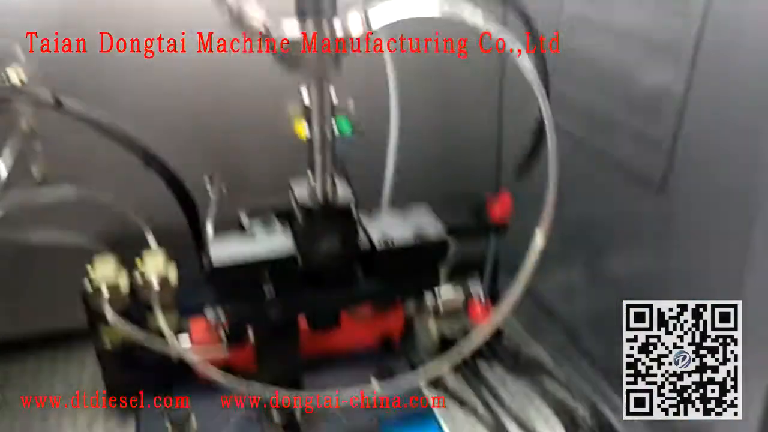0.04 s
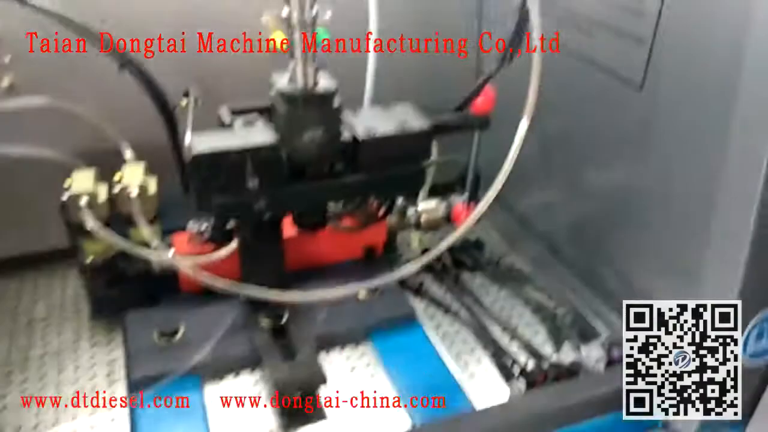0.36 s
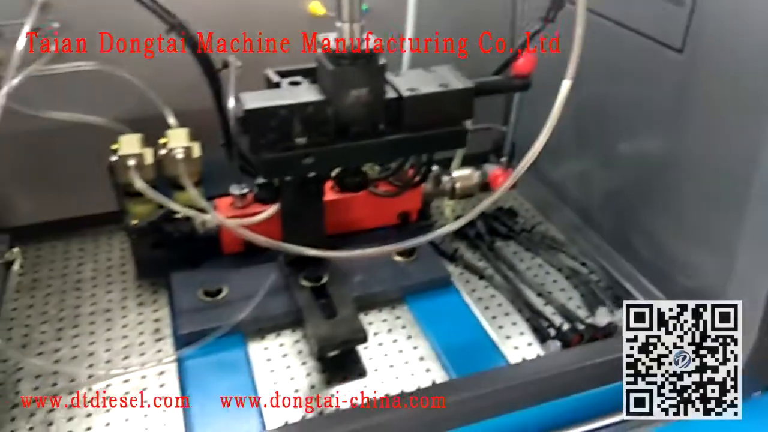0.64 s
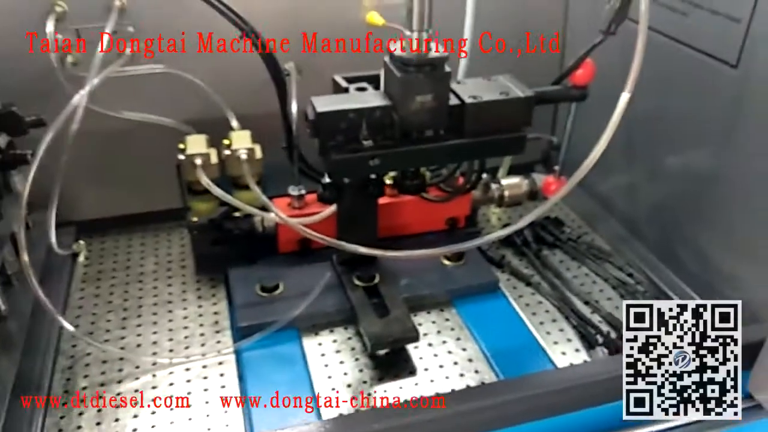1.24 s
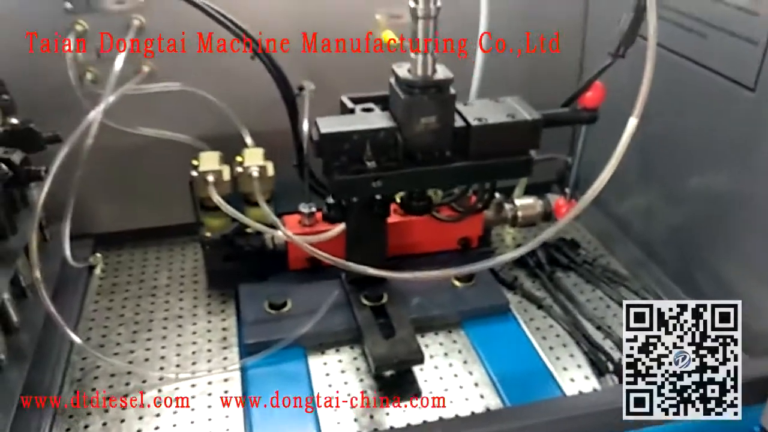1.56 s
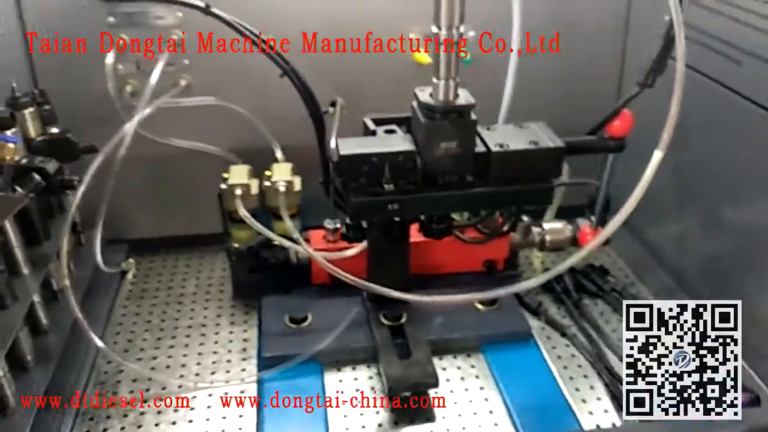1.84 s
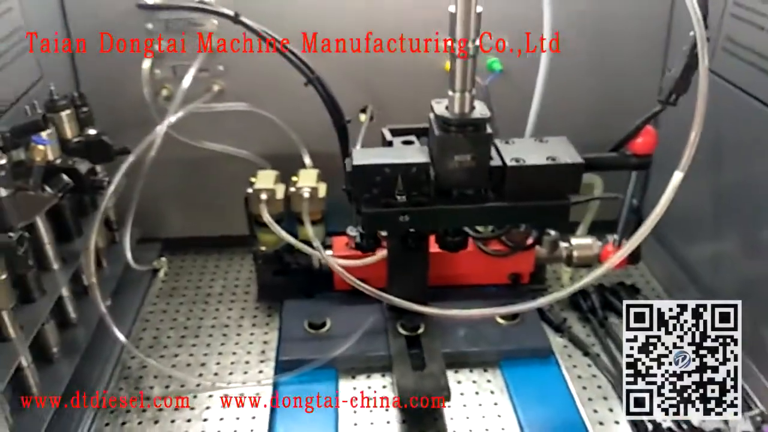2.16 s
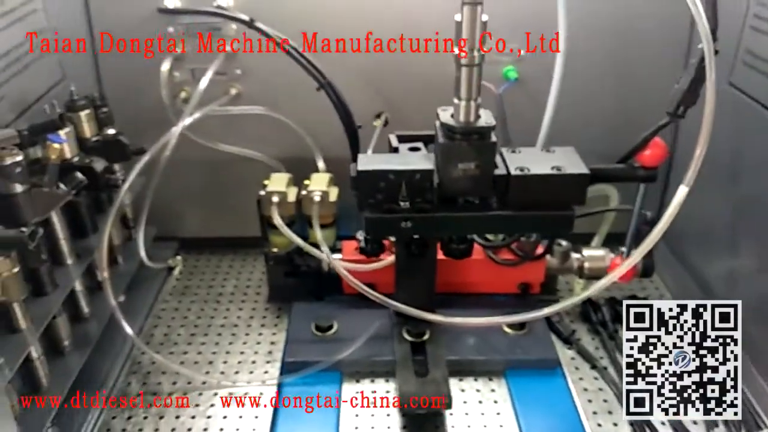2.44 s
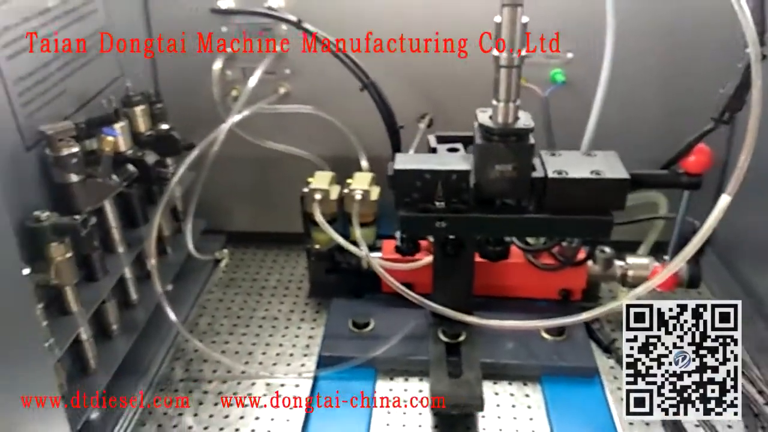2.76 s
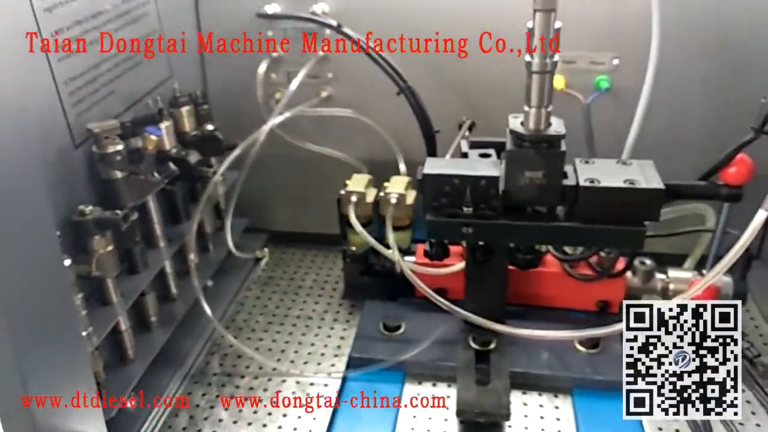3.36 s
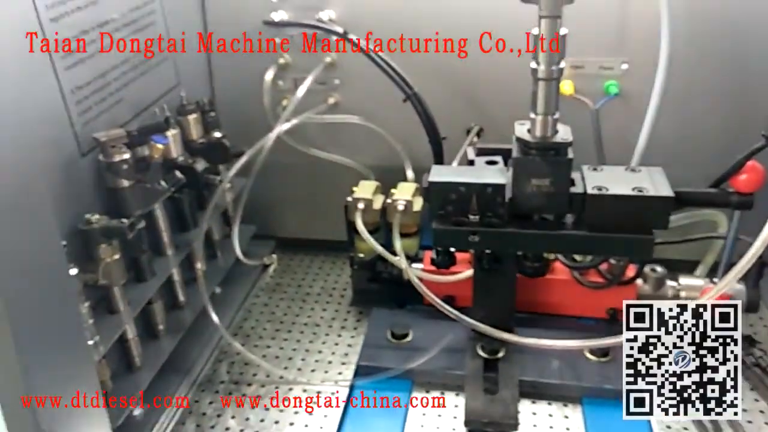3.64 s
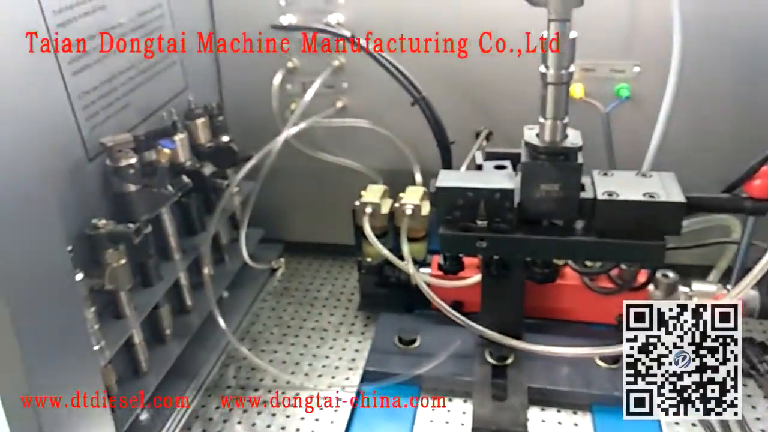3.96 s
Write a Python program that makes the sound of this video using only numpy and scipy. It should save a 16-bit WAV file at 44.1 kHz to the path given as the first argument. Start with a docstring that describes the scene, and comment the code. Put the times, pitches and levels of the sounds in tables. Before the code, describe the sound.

Inside a steel cabinet, a fuel injector rattles fast and regularly throughout, its bright clicks ringing and buzzing near a hand-held microphone. The test machine's motor rushes and rumbles beneath it with a faint high whine.

```python
"""Diesel injector on a test bench

An injector fires 17 times a second in a steel cabinet, heard from a hand-held microphone. Each valve
impact gives a bright crack and excites the normal modes of the injector and its clamping fixture.
The nozzle needle then oscillates in the fuel flow, a short buzz that reflects off the cabinet walls.
Underneath, the drive motor rushes and rumbles and its inverter whines."""
import sys
import numpy as np
from scipy import signal
from scipy.fft import rfft, irfft
from scipy.io import wavfile
from scipy.ndimage import map_coordinates

SR = 44100
rng = np.random.default_rng(int(sys.argv[2]) if len(sys.argv) > 2 else 0)


def pcm_store(signal):
    """Save signal as 16-bit PCM."""
    levels = np.round(np.clip(np.atleast_2d(signal), -1, 1) * 32767)
    wavfile.write(sys.argv[1], SR, levels.astype(np.int16).T)


N = 176400
TIME = np.arange(N) / SR
SHOTS_PER_S, FIRST_SHOT_S = 17.001, .0212
PERIOD, LEAD_S = round(SR / SHOTS_PER_S), .008  # samples per cam turn; a turn starts LEAD_S before its shot
SHOT, TURN_SAMPLE = np.divmod(np.arange(N) + PERIOD - round((FIRST_SHOT_S - LEAD_S) * SR), PERIOD)
AGE = TURN_SAMPLE / SR - LEAD_S  # time since this turn's shot, in s


def from_db(db):
    """Amplitude ratio of a level in decibels."""
    return 10 ** (np.asarray(db) / 20)


def rms_one(x):
    """Normalisation to unit rms."""
    return x / np.sqrt(np.mean(x ** 2) + 1e-20)


def coloured(noise, spectrum):
    """Spectral shaping to unit rms, with the level interpolated over log frequency."""
    hz, db = np.transpose(spectrum)
    bin_hz = np.maximum(np.arange(N // 2 + 1) * SR / N, 1)
    gain = from_db(np.interp(np.log(bin_hz), np.log(hz), db))
    return rms_one(irfft(rfft(noise) * gain, N))


def drift(knots_per_s):
    """Smooth random modulation with a standard deviation near 1."""
    return map_coordinates(rng.standard_normal(400), [TIME * knots_per_s], order=3, mode="wrap")


def per_shot(spread_db):
    """Log-normal scatter of amplitude from shot to shot."""
    return from_db(spread_db * rng.standard_normal(SHOT[-1] + 1))[SHOT]


def cyclic_noise(share, memory):
    """Cyclic correlation: a share of the power is a pattern, correlated by `memory` from turn to turn."""
    turns = rng.standard_normal((SHOT[-1] + 1, PERIOD))
    for k in range(1, len(turns)):
        turns[k] = memory * turns[k - 1] + np.sqrt(1 - memory ** 2) * turns[k]
    return np.sqrt(share) * turns[SHOT, TURN_SAMPLE] + np.sqrt(1 - share) * rng.standard_normal(N)


def envelope(age, attack, hold, t60):
    """Linear rise, then exponential decay from the age `hold` on; times in s."""
    return np.clip(age / attack, 0, 1) * from_db(-60 * np.maximum(age - hold, 0) / t60)


def resonate(force, modes, spread_db):
    """Modal superposition: parallel resonators, each driven unevenly per shot; the force's rms is kept."""
    out = 0
    for k, (hz, width_hz, first_db, last_db) in enumerate(modes):
        radius = np.exp(-np.pi * width_hz / SR)
        feedback = [1, -2 * radius * np.cos(2 * np.pi * hz / SR), radius ** 2]
        ring = signal.lfilter([1, 0, -1], feedback, force * per_shot(spread_db) + 1e-18)
        out = out + (-1) ** k * rms_one(ring) * from_db(np.linspace(first_db, last_db, N))
    return rms_one(out) * force.std()


# Spectrum of the valve impact (f/Hz, relative level/dB)
CRACK_SPECTRUM = [(1000, -20.5), (2200, -4.5), (4000, -10), (7000, -8), (7900, 4), (9300, 9), (11000, 0.5),
                  (13500, 4), (15800, -4)]
# Modes of the injector steel (f/Hz, bandwidth/Hz, relative level/dB at the scene's start and end)
INJECTOR_MODES = [(7760, 89, 5, 4), (8900, 90, -48, -48), (8980, 200, -19, 12), (9280, 510, -23, 12),
                  (10100, 390, 2, 11), (10510, 39, 3, 8), (11320, 240, 1, -8), (12340, 140, 5, -21),
                  (13900, 240, -11, -6.5), (14900, 160, -4, 5)]


def valve_crack():
    """Impact excitation: the valve slams, radiating a broadband snap and rattling the steel's modes."""
    grain, rattle = cyclic_noise(share=.65, memory=.6), cyclic_noise(share=.7, memory=.65)
    snap = coloured(grain, CRACK_SPECTRUM) * per_shot(spread_db=2)
    snap *= envelope(AGE + .0006, attack=.00066, hold=.0053, t60=.052)
    force = rattle * envelope(AGE + .00041, attack=.00019, hold=.0011, t60=.028)
    return from_db(-20.5) * snap + from_db(-23) * resonate(force, INJECTOR_MODES, spread_db=6)


# Harder shots that make the steel sing (t/s, relative level/dB, f/Hz)
HARD_IMPACTS = [(0.1386, -16, 9270), (0.1974, -7.5, 8000), (0.2563, -9, 7960), (0.3157, -11, 8040),
                (0.4918, -14.5, 7990), (0.5526, -10.5, 8220), (0.6674, -9, 8100), (1.0204, -13.5, 8190),
                (1.5514, -12, 8920), (1.6686, -13, 9090), (1.7285, -12.5, 8170), (2.0817, -19, 8000),
                (2.1999, -11.5, 8000), (2.3166, -11, 8000), (2.4329, -12, 9030), (2.4912, -12.5, 9300),
                (2.6678, -8.5, 9040), (2.7851, -16, 9280), (3.1383, -11.5, 9450), (3.1971, -12, 9280),
                (3.256, -10, 9370), (3.3737, -17, 9650), (3.903, -10, 9100), (3.9614, -24, 9600)]


def hard_shots():
    """Beating: on a harder shot the steel rings in four close partials that interfere unevenly."""
    out = np.zeros(N + SR)
    age = np.arange(PERIOD) / SR
    decay = envelope(age, attack=.001, hold=.0026, t60=.043)
    detune_hz = 140
    for s, db, hz in HARD_IMPACTS:
        nearest_shot = round((s - FIRST_SHOT_S) * SHOTS_PER_S)
        start = int((FIRST_SHOT_S + nearest_shot / SHOTS_PER_S) * SR)
        cluster = sum(np.sin(2 * np.pi * ((hz + detune_hz * rng.standard_normal()) * age + rng.random()))
                      for _ in range(4))
        out[start:start + PERIOD] += from_db(db - 6) * rms_one(cluster) * decay
    return out[:N]


# Natural frequencies of the clamping fixture (f/Hz)
FIXTURE_MODE_HZ = [1350, 1545, 1730, 2430, 2520, 2600, 2750, 2980, 3140, 3430, 3630, 4100, 5400, 6330]
# One row per mode (relative level/dB at the start, middle and end of the microphone's path)
FIXTURE_MODE_LEVELS = [(-4, -5.5, 3.5), (-14, -9.5, 5), (1, 0, -1), (-6, 0, 7), (0.5, -0.5, 3),
                       (-1.5, -3.5, 0), (-1, -1.5, -2.5), (-1.5, 3.5, -1.5), (5.5, 3.5, -10),
                       (1, -8.5, -21.5), (-8, -12.5, -7.5), (-6, -6, 0), (-9, -9, -1), (-3, -6.5, -6)]
# Spectrum of the cabinet's reverberation (f/Hz, relative level/dB)
REVERB_SPECTRUM = [(400, -14.5), (1000, -23), (1300, -10.5), (2100, -1), (3000, 0.5), (4500, 0.5),
                   (6800, -3), (9000, -10), (15000, -15.5)]


def fixture_ring():
    """Free vibration: each blow rings the same modes of the clamp and reverberates in the cabinet."""
    ring = 0
    for hz, levels in zip(FIXTURE_MODE_HZ, FIXTURE_MODE_LEVELS):
        phase_wander = .5 * drift(2) + .2 * drift(120)
        db = np.interp(TIME, np.linspace(0, TIME[-1], len(levels)), levels)
        ring = ring + from_db(db) * np.sin(2 * np.pi * (hz * AGE + rng.random()) + phase_wander)
    ring = rms_one(ring) * envelope(AGE - .0016, attack=.0056, hold=.012, t60=.06)
    reverb = coloured(cyclic_noise(share=.78, memory=.952), REVERB_SPECTRUM)
    reverb *= envelope(AGE, attack=.0054, hold=.0093, t60=.032)
    return from_db(-24.5) * ring + from_db(-28) * reverb


BUZZ_START_S, BUZZ_LENGTH_S = .006857, .0215


def needle_burst(age):
    """Flow-induced oscillation: the needle starts sharp, settles, flutters and swells until it shuts."""
    settled_hz, sharp_hz, settle_s = 863.7, 89, .0037
    flutter_hz, swell_db, edge_s = 165, 1.5, .0027
    age = np.clip(age, 0, BUZZ_LENGTH_S)
    gate = np.clip(np.minimum(age, BUZZ_LENGTH_S - age) / edge_s, 0, 1)
    swell = from_db(swell_db * (age / BUZZ_LENGTH_S - 1))
    flutter = 1 - .27 * np.cos(2 * np.pi * flutter_hz * age)
    cycles = settled_hz * age + sharp_hz * settle_s * (1 - np.exp(-age / settle_s))
    return np.sqrt(2) * gate * swell * flutter * np.sin(2 * np.pi * cycles)


# Reflections off the cabinet walls (delay/s, level/dB relative to the direct sound)
WALL_ECHOES = [(.0105, -6), (.0283, -18)]
# Standing waves of the air in the cabinet (f/Hz, level/dB, T60/s, delay/s)
CABINET_MODES = [(796, -27.5, 0.3, 0.0114), (987, -35, 0.061, 0.0064), (1006, -34, 0.19, 0.0093),
                 (974, -24.5, 0.036, 0.0024)]


def needle_buzz():
    """Reflection and cavity resonance: each burst echoes off the walls while the enclosed air rings."""
    age = np.arange(SR // 4) / SR
    direct = needle_burst(age - BUZZ_START_S)
    echoes = sum(from_db(db) * needle_burst(age - BUZZ_START_S - delay) for delay, db in WALL_ECHOES)
    response = from_db(-16.5) * (direct + echoes)
    for hz, db, t60, delay in CABINET_MODES:
        decay = envelope(age - delay, attack=.0052, hold=.0013, t60=t60)
        response += from_db(db) * np.sin(2 * np.pi * hz * age) * decay
    triggers = (TURN_SAMPLE == round(LEAD_S * SR)) * per_shot(spread_db=.22)
    return signal.fftconvolve(triggers, response)[:N]


# Spectrum of the flow past the needle (f/Hz, relative level/dB)
RASP_SPECTRUM = [(450, -25), (720, -10), (900, 14.5), (1080, -11.5), (1300, -11), (1750, -3), (2300, -21)]


def fuel_rasp():
    """Flow noise: fuel tearing past the needle roughens the buzz."""
    flow = envelope(AGE - BUZZ_START_S, attack=.0011, hold=BUZZ_LENGTH_S, t60=.03)
    return from_db(-25) * flow * coloured(cyclic_noise(share=.41, memory=.55), RASP_SPECTRUM)


# Spectrum of motor and pump (f/Hz, relative level/dB)
MOTOR_SPECTRUM = [(25, -38), (90, -34.5), (130, -17), (200, -11), (300, -15.5), (370, -5.5), (480, -6),
                  (600, -2.5), (750, -4.5), (1000, 3), (1250, -10), (1700, -10), (2200, -17), (3200, -18.5),
                  (5000, -24.5), (7000, -27), (9000, -23.5), (15500, -37)]


def motor_rush():
    """Rotating-machine noise: the rush of motor and pump partly repeats with each turn of the shaft."""
    return from_db(-30 + drift(12)) * coloured(cyclic_noise(share=.35, memory=.999), MOTOR_SPECTRUM)


# Spectrum of the drive's rumble (f/Hz, relative level/dB)
RUMBLE_SPECTRUM = [(60, -49), (100, -33.5), (150, -8), (190, -1), (220, 3), (255, -2.5), (295, -2),
                   (360, -12.5), (600, -50)]
# Its slow rise and fall (t/s, level/dB)
RUMBLE_CONTOUR = [(0, -35), (.25, -33), (.6, -38), (.75, -32), (.92, -42.5), (1.05, -33), (1.38, -29),
                  (1.52, -33), (1.68, -28), (1.8, -38.5), (2.1, -33), (2.45, -33.5), (3.02, -38.5),
                  (3.25, -27), (3.42, -32.5), (3.62, -28.5), (3.74, -40), (4, -46)]


def drive_rumble():
    """Random amplitude modulation: the drive's low-frequency noise comes in lumps."""
    s, db = np.transpose(RUMBLE_CONTOUR)
    lumps = from_db(4 * np.tanh(drift(30)))
    noise = coloured(cyclic_noise(share=.5, memory=.97), RUMBLE_SPECTRUM)
    return from_db(np.interp(TIME, s, db)) * rms_one(lumps * noise)


# Tones of inverter and motor (f/Hz)
TONE_HZ = [1547, 3750, 5000, 10000, 12000, 12155]
# Their strength along the microphone's path (t/s, then level/dB for each tone)
TONE_LEVELS = [(0, -45, -52, -44, -43, -54, -47), (.4, -40, -50, -50, -48, -41, -54),
               (.55, -42, -46, -37.5, -54, -38, -60), (.85, -46, -44, -39.5, -59, -45.5, -60),
               (1.15, -47, -40.5, -65, -58, -40, -40), (1.65, -42, -42, -41, -46, -43, -48),
               (2.05, -40, -56, -43, -66, -33, -53), (2.3, -40, -50, -62, -62, -47, -49),
               (2.8, -36, -66, -59, -37.5, -38, -50), (3, -37, -53, -41.5, -47, -38.5, -62),
               (3.55, -49, -60, -37.5, -45, -38, -51), (4, -56, -59, -43, -55, -40.5, -42)]


def inverter_whine():
    """Amplitude and phase modulation: electrical tones of steady pitch flicker quickly."""
    s, *levels = np.transpose(TONE_LEVELS)
    out = 0
    for hz, db in zip(TONE_HZ, levels):
        flicker = from_db(2 * drift(14) + 4 * drift(60))
        tone = np.sin(2 * np.pi * hz * TIME + .9 * drift(50))
        out = out + from_db(np.interp(TIME, s, db)) * rms_one(flicker * tone)
    return out


# Gains along the microphone's path (t/s, then level/dB for crack, fixture, buzz and motor)
PATH_GAINS = [(0, 4.5, 0.5, -2, 1), (.3, 4.5, -5.5, -2, 2), (.6, 1.5, -4, -.5, 2), (.92, 0, -0.5, 0.5, 0),
              (1.2, 2, 1, 1.5, 2.5), (1.4, 1, 0, 2.5, 5), (1.65, 1.5, 1, 1.5, 2.5), (2.05, 2, 1.5, 0.5, 2),
              (2.4, 1.5, 0.5, -0.5, 2), (2.8, 3.5, 0, -1, 3), (3.3, 0.5, 1.5, -2, 1.5), (4, 2.5, -1, -2, 2)]


def scene():
    """Superposition: injector and drive add, their balance shifting; both channels are the same."""
    s, *levels = np.transpose(PATH_GAINS)
    crack_gain, ring_gain, buzz_gain, motor_gain = [from_db(np.interp(TIME, s, db)) for db in levels]
    impacts = crack_gain * valve_crack() + hard_shots() + ring_gain * fixture_ring()
    nozzle = buzz_gain * (needle_buzz() + fuel_rasp())
    drive = motor_gain * motor_rush() + drive_rumble() + inverter_whine()
    return np.array([impacts + nozzle + drive] * 2)


def record(dry):
    """Band limiting: an elliptic low-pass cuts steeply above 15.9 kHz."""
    return signal.sosfilt(signal.ellip(10, .2, 80, 15900, fs=SR, output="sos"), dry)


dry = scene()
out = record(dry)
pcm_store(out)
```